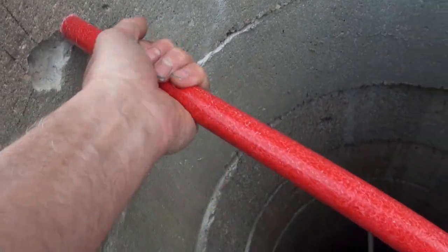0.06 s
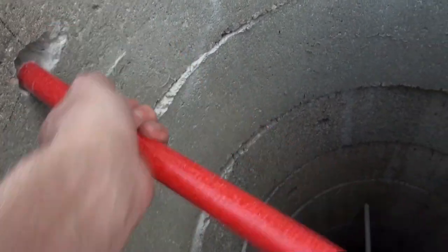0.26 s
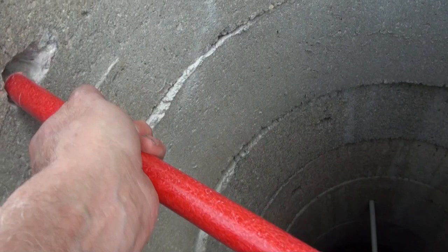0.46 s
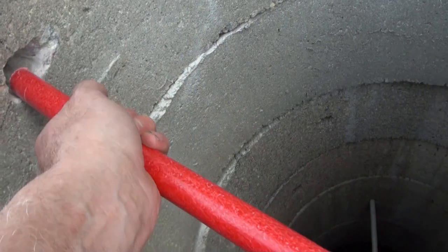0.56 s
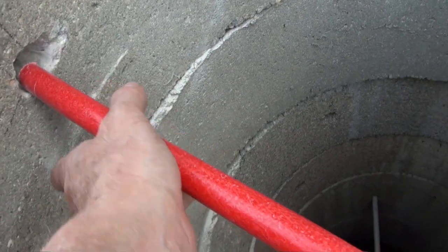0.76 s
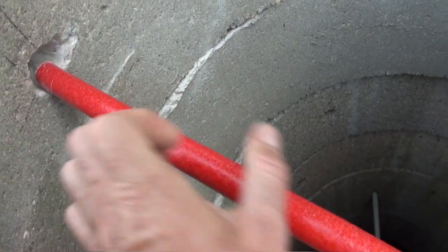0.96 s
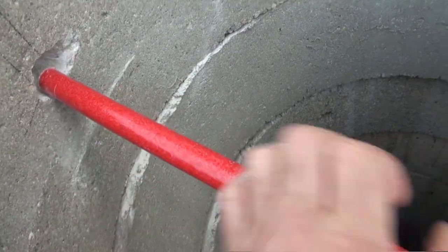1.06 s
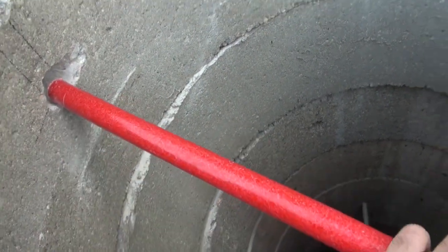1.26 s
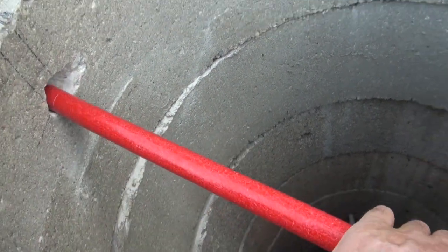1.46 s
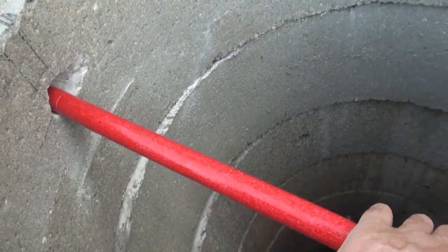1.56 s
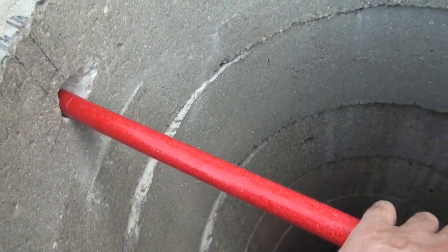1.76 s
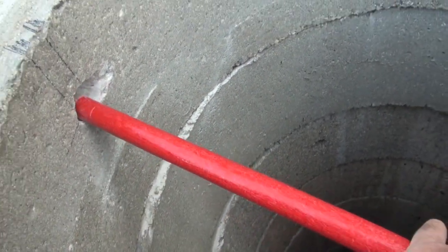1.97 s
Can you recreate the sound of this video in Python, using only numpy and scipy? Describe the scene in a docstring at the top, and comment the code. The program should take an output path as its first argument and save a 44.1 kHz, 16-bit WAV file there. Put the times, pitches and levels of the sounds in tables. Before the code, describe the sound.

Close, rough scrapes and hard hollow clacks of a pole being worked into a concrete notch come in uneven bursts, the strongest early on, over outdoor wash and low wind bumps, with a short dense echo from the shaft.

```python
"""A hollow handle worked into a notch in the wall of a concrete shaft scrapes over grit and knocks the rim.
Random slips and blunt pushes drive broad grit bands and the handle's modes; the shaft adds a late, dense echo.
Shaped noise makes an outdoor wash and the wind thumping the two microphone ports.
Near the end a faint low tone swells, made of noise through a narrow resonance."""
import sys
import numpy as np
from scipy import signal
from scipy.fft import rfft, irfft, next_fast_len
from scipy.io import wavfile
from scipy.ndimage import uniform_filter1d, minimum_filter1d

SR = 44100
rng = np.random.default_rng(int(sys.argv[2]) if len(sys.argv) > 2 else 0)


def volts_from_db(level):
    """Convert decibel levels to linear amplitude ratios."""
    exponent = np.asarray(level, float) / 20
    return 10 ** exponent


def digitize_waveform(pressure):
    """Quantize a signal to 16-bit integers and store it at the path in sys.argv[1].

    Rows of a 2-D input are taken as channels; values are limited to [-1, 1].
    """
    field = np.atleast_2d(pressure).T
    bounded = np.clip(field, -1, 1)
    quanta = np.round(bounded * 32767).astype(np.int16)
    wavfile.write(sys.argv[1], SR, quanta)


N = 88200  # samples

# Scrape strokes, one curve each: (time [s], pressure [dB], brightness [dB/octave], ring [dB],
# bending drive [dB])
SCRAPE_CURVES = [
    [(.118, -54, 19, 26, -8), (.13, -30.5, 13, 8, -3), (.147, -34, 18, 21, -9), (.151, -23, 13, 5, -10),
     (.185, -23, 12.5, 7, -19), (.2, -39.5, 17, -17, -14), (.24, -66, 18, -9, -9)],
    [(.3, -40, 11, 6, -15), (.32, -38, 11.5, 5, -15), (.355, -34.5, 17, 11, -15),
     (.367, -10.5, 7.5, -14, -9), (.379, -29.5, -20, -27, -5)],
    [(.382, -26, -1.5, -13, -4), (.391, -12.5, 6, 9, 15), (.399, -33, 11, -8, -15)],
    [(.402, -14.5, -4.5, -24, -20), (.42, -7.5, 2.5, -1.5, -5), (.445, -14, 0, -7.5, 19.5),
     (.47, -16.5, -2, -0.5, 0.5), (.52, -39, -1, 17, -10), (.56, -44.5, -12, -14, -11)],
    [(.654, -18.5, 1.5, -2, -7), (.66, -22.5, -2.5, -15, 5), (.7, -42, -5, 2, -3), (.73, -63, 14, -3, -13)],
    [(.945, -20, -9, 4.5, -10), (.963, -21.5, 0, 16.5, -26), (.971, -17, 4, -4, -17),
     (1.0, -15, -0.5, 1, -18), (1.03, -27.5, 3, 4, -26), (1.07, -43.5, -19, -9, 2)],
    [(1.464, -36, 14, -15, -12), (1.474, -21, -1, 8, -14), (1.482, -8.5, -3, 9, -19),
     (1.49, -14, 0.5, 0, -19), (1.5, -18.5, -3, 11.5, 4.5), (1.525, -8.5, -4, -35, -17),
     (1.572, -38, 8, -1, 9), (1.594, -24.5, 5.5, -8, -7)],
    [(1.595, -10, 0.5, -32, -8), (1.63, -33, -9.5, 9, 7), (1.68, -43, -8.5, -5.5, 5)],
]
# Hold on the handle in each stroke: (damping factor on mode widths [1], contact place [share of length])
HANDLE_GRIPS = [(4.3, .518), (2.5, .525), (6, 0.47), (1.9, 0.304), (4.6, 0.057), (1.3, 0.2406),
                (1.34, 0.437), (2.7, 0.21)]


def evened(x):
    """Scales to rms 1."""
    return x / np.sqrt(np.mean(x ** 2) + 1e-20)


def read(points, hz):
    """Reads a spectrum on a log frequency axis."""
    f, value = np.transpose(points)
    return np.interp(np.log(hz + 1), np.log(f + 1), value)


def along(rows, column=1):
    """Reads a column of a time curve at every sample."""
    rows = np.transpose(rows)
    return np.interp(np.arange(N) / SR, rows[0], rows[column])


def drift(size):
    """Slow random curve of rms 1: white noise averaged twice over size samples."""
    once = uniform_filter1d(rng.standard_normal(N), size=size)
    return evened(uniform_filter1d(once, size=size))


def ring(x, hz, width_hz):
    """Two-pole resonance whose impulse response has energy 1."""
    r = np.exp(-np.pi * width_hz / SR)
    w = 2 * np.pi * hz / SR
    poles = [1, -2 * r * np.cos(w), r * r]
    return signal.lfilter([0, np.sin(w)], poles, x) * np.sqrt(2 * (1 - r * r))


def noise(colour, same, patchy_db):
    """Two partly alike channels of random spectra, with patches drifting in time and frequency."""
    frames, hz = N // 256 + 5, np.fft.rfftfreq(1024, 1 / SR)
    a, b, c, d, patches = rng.standard_normal((frames, 513, 5)).T
    patches = uniform_filter1d(patches, size=10, axis=0)
    patches = evened(uniform_filter1d(patches, size=10, axis=1))
    same = np.clip(same * np.ones(513), -1, 1)[:, None]
    left, other = a + 1j * b, c + 1j * d
    z = np.array([left, same * left + np.sqrt(1 - same ** 2) * other])
    z = z * volts_from_db(read(colour, hz)[:, None] + patchy_db * patches)
    return evened(signal.istft(z, nperseg=1024, noverlap=768)[1][:, :N])


def wash():
    """Outdoor hiss: coloured noise that swells slowly."""
    # (frequency [Hz], relative density [dB/Hz])
    wash_colour = [(88, -15.5), (150, -8), (378, -12), (459, -14.5), (625, -8), (675, -6.5), (1050, -11),
                   (4210, -8.5), (15000, -45)]
    # (time [s], level [dB])
    wash_swell = [(0, 0), (.22, 3.5), (.3, 0.5), (.58, -3.5), (.75, -2), (1.1, -1.5), (1.45, -0.5),
                  (1.72, 1), (2, 2)]
    # Channel likeness, before the root and factor below: (frequency [Hz], likeness [1])
    wash_same = [(130, 1), (400, 0.25), (1380, 0.26), (3030, 0.45), (14600, .1)]
    base_db = -36.5
    same = np.sqrt(abs(read(wash_same, np.fft.rfftfreq(1024, 1 / SR)))) * 0.6
    return volts_from_db(base_db + along(wash_swell)) * noise(wash_colour, same, patchy_db=1.77)


def wind():
    """Gusts thump the ports: lumpy low-frequency noise."""
    # (time [s], level [dB])
    gusts = [(0, -39.5), (.12, -51), (.19, -43), (.34, -55), (.4, -56), (.6, -51), (.84, -45), (.89, -34.5),
             (.93, -45), (1.02, -31.5), (1.1, -47), (1.24, -34), (1.43, -48.5), (1.55, -39), (1.64, -40),
             (1.72, -59), (2, -42.5)]
    # (frequency [Hz], level [dB])
    wind_colour = [(9, -37), (20, 2.5), (130, -5), (230, -9.5), (500, -15.5), (900, -71)]
    lump_rms_db = 0.5
    level_db = along(gusts) + lump_rms_db * drift(900)
    return volts_from_db(level_db) * noise(wind_colour, same=0.88, patchy_db=3.0)


def body(force, bright, ring_db, bend_db, grip, place, thump_db=0):
    """A contact force crushes grit and rings the handle; modes with a node at the contact stay weak."""
    # Broad bands of crushed grit: (centre [Hz], width [Hz], level [dB])
    grit_bands = [(552, 515, -17.5), (1372, 860, 0), (2115, 1020, 2.5), (3010, 1470, -2), (5710, 3900, -15),
                  (8200, 22000, -57)]
    # Handle modes, first two a beating bending pair that grip leaves alone:
    # (frequency [Hz], level [dB], t60 before grip [s])
    handle_modes = [(634, -6, 0.12), (645, -10, 0.25), (770, -9, 0.06), (1050, -5, 0.07), (1241, -12, 0.1),
                    (1577, -12, 0.16), (1775, 1, 0.07), (1926, -2, .15), (2273, -3, 0.52), (2378, -4, 0.12),
                    (3045, 0, .26), (3118, -0.5, 0.04), (3835, -6, 0.18), (4673, -22, 0.24),
                    (5500, -42, 0.031)]
    grit_db, pivot_hz = -4, 2115
    bend_step, node_share = 7.2, .15  # root of Hz per bending order; gain left at a node

    def tilted(hz):
        return force * volts_from_db(bright * np.log2(hz / pivot_hz))

    grit = 0
    for k, (hz, width_hz, db) in enumerate(grit_bands):
        level_db = db if k else db + thump_db  # thump lifts the lowest band
        band = ring(ring(tilted(hz), hz, width_hz), hz, width_hz) * np.sqrt(width_hz / SR)
        grit = grit + (-1) ** k * volts_from_db(level_db) * band

    modes = 0
    for k, (hz, db, t60_s) in enumerate(handle_modes):
        width_hz = np.log(1000) / np.pi / t60_s
        if k > 1:
            width_hz = width_hz * grip
            drive = node_share + abs(np.cos(np.pi * place * np.sqrt(hz) / bend_step))
        else:
            drive = volts_from_db(bend_db)
        mode = ring(tilted(hz) * volts_from_db(ring_db) * drive, hz, width_hz)
        modes = modes + (-1) ** max(k, 1) * volts_from_db(db) * mode
    return volts_from_db(grit_db) * grit + modes / np.sqrt(len(handle_modes))


def scrapes():
    """Clumped slips of random size and sign, scaled by each stroke's pressure, drive grit and handle."""
    slips_per_s, slip_spread_db, clump_rms_db, base_ring_db = 2500, 1.4, 2.5, -3.5
    size_db = slip_spread_db * np.minimum(rng.exponential(1, N), 3)
    slips = volts_from_db(size_db) * (rng.random(N) < slips_per_s / SR)
    slips = evened(slips * volts_from_db(clump_rms_db * drift(150)) * rng.choice([-1., 1.], N))
    out = np.zeros(N)
    for rows, (grip, place) in zip(SCRAPE_CURVES, HANDLE_GRIPS):
        start, end_s = round(rows[0][0] * SR), rows[-1][0]
        span = slice(start, min(round(end_s * SR) + SR // 3, N))  # room to ring out
        on = (np.arange(N) < end_s * SR)[span]
        db, bright, ring_db, bend_db = (along(rows, column=k)[span] for k in range(1, len(rows[0])))
        force = on * volts_from_db(db) * slips[span]
        out[span] += body(force, bright, base_ring_db + ring_db, bend_db, grip, place)
    return out


def shaft(x):
    """The depth of the shaft answers late: sparse random taps under a frequency-dependent decay."""
    # (frequency [Hz], t60 [s])
    shaft_decay = [(300, 0.7), (700, 0.35), (2000, 0.24), (4000, 0.3), (9000, 0.25)]
    echo_s, rise_s, echo_db, echo_same = 0.0178, 0.00053, -9, 0.7
    taps = np.zeros((2, SR // 2))
    slots = np.arange(0, SR // 2 - 20, 20)
    at = slots + rng.integers(0, 20, (2, len(slots)))
    np.put_along_axis(taps, at, rng.choice([-1., 1.], at.shape), 1)
    taps[0] = echo_same * taps[1] + np.sqrt(1 - echo_same ** 2) * taps[0]
    hz, t, z = signal.stft(taps, SR, nperseg=256)
    decay = volts_from_db(-60 * t / read(shaft_decay, hz)[:, None])
    tail = signal.istft(z * decay, SR, nperseg=256)[1]
    tail = tail * np.clip((np.arange(tail.shape[1]) / SR - echo_s) / rise_s, 0, 1)
    tail = volts_from_db(echo_db) * tail / np.linalg.norm(tail[1])
    tail[:, 0] = 1  # direct sound
    return signal.fftconvolve(x[None], tail, axes=1)[:, :N]


def knocks():
    """Each knock is a blunt push with a brief noisy crunch into grit and handle."""
    # (time [s], level before gain [dB], brightness [dB/octave], ring before lift [dB], bending drive [dB])
    knock_rows = [(0.1493, -15.5, -1.5, -12, 8.5), (0.19, -11, 5.5, -38, -15), (0.342, -30, 5, 2, -12),
                  (0.391, -8.5, -5.5, -10, -22), (.403, 16, 3, -28, -23), (0.405, 4.5, 5, -43, -21),
                  (.44, -13.5, -6, -23.5, 19.5), (.640, 2.5, 1.5, -23.5, -3), (.720, -23.5, -12.5, -29, -5),
                  (0.946, -12, -3.5, -2.5, -13), (.965, -3.5, -4, -12, -19), (.968, -7, 8.5, -1.5, -20),
                  (1.466, -13.5, 2, 0.5, -8), (1.494, -0.5, -7, -24, -11), (1.526, -3.5, 2, -13, 20),
                  (1.581, -8.5, -2.5, -14.5, 15), (1.596, -9.5, -2.5, -13.5, -7),
                  (1.6864, -7.5, -4, -10, -24)]
    gain_db, ring_lift_db, thump_db = 11.5, 13.5, 7.5
    contact_hz, damping, crunch_s, crunch_share = 7340, 1.4, .0012, .1
    force, bright, ring_db, bend_db = np.zeros((4, N))
    fade = np.exp(-np.arange(128) / SR / crunch_s)
    pushes = crunch_share * rng.standard_normal((len(knock_rows), 128)) * fade
    pushes[:, 0] = 1
    for (s, db, *rest), push in zip(knock_rows, pushes):
        at = slice(round(s * SR), round(s * SR) + len(push))
        force[at] = volts_from_db(db + gain_db) * push / np.linalg.norm(push)
        bright[at], ring_db[at], bend_db[at] = rest
    # Contact place of the latest stroke begun
    starts_s = [rows[0][0] for rows in SCRAPE_CURVES]
    latest = np.searchsorted(starts_s, np.arange(N) / SR) - 1
    place = np.transpose(HANDLE_GRIPS)[1][latest]
    struck = body(force, bright, ring_db + ring_lift_db, bend_db, damping, place, thump_db)
    return signal.lfilter(*signal.butter(2, contact_hz, fs=SR), struck)


def hum():
    """Faint low, slightly fuzzy tone: noise through two equal narrow resonances."""
    # (time [s], level [dB])
    hum_swell = [(1.8, -70), (1.89, -43.5), (1.96, -45), (2.0, -46)]
    hz, width_hz = 313, 28
    tone = ring(ring(rng.standard_normal(N), hz, width_hz), hz, width_hz)
    return volts_from_db(along(hum_swell)) * evened(tone)


def limit(x):
    """Quick limiter: eases the gain down around peaks over the ceiling."""
    ceiling = .9
    room = np.minimum(1, ceiling / (abs(x).max(0) + 1e-9))
    return x * uniform_filter1d(minimum_filter1d(room, size=129), size=129)


def scene():
    """Sums all sources ahead of the channel differences."""
    return shaft(scrapes() + knocks()) + wash() + wind() + hum()


def low_pass(x):
    """Removes everything above the highest recorded frequency."""
    return signal.sosfilt(signal.butter(12, 15180, fs=SR, output="sos"), x)


def record(dry):
    """The two channels differ in level and phase, and the left loses its treble above about 11.5 kHz; a limiter
    holds the peaks."""
    # (frequency [Hz], left over right [dB])
    channel_balance = [(60, -15.5), (250, -10), (690, -11), (2340, -12), (4300, -2), (7920, 12), (11200, -3.5),
                       (11900, -58)]
    # (frequency [Hz], left lead [rad])
    port_phase = [(0, 1.5), (1030, 0.54), (2330, -0.5), (4480, -1.5), (8270, -0.9), (15000, 1)]
    size = next_fast_len(N + 4096)
    hz = np.fft.rfftfreq(size, 1 / SR)
    half = volts_from_db(read(channel_balance, hz) / 2) * np.exp(.5j * read(port_phase, hz))
    ports = np.array([half, 1 / half]) * 2 / (abs(half) + 1 / abs(half))
    heard = irfft(rfft(dry, size) * ports, size)[:, :N]
    return low_pass(limit(heard))


dry = scene()
out = record(dry)
digitize_waveform(out)
```